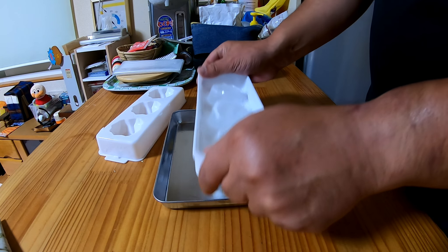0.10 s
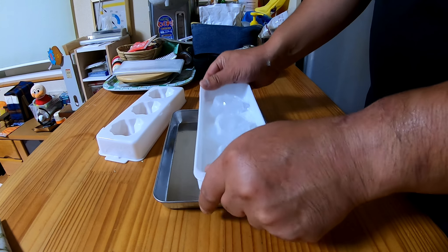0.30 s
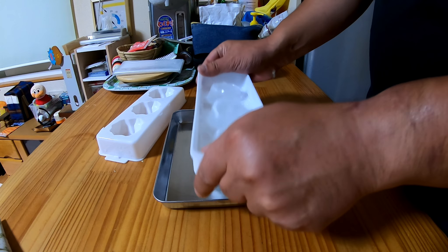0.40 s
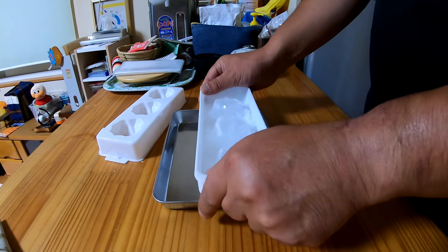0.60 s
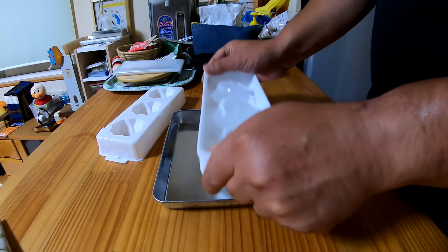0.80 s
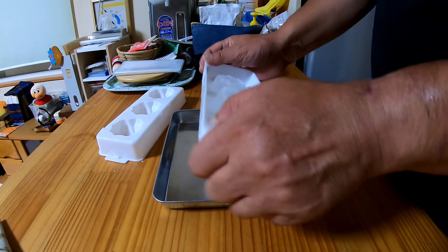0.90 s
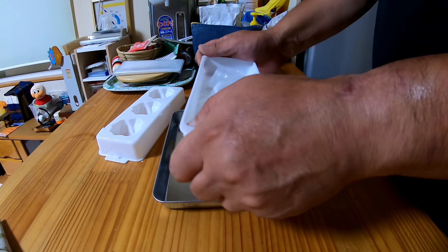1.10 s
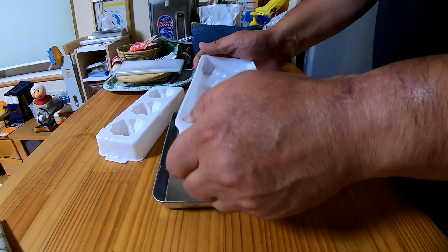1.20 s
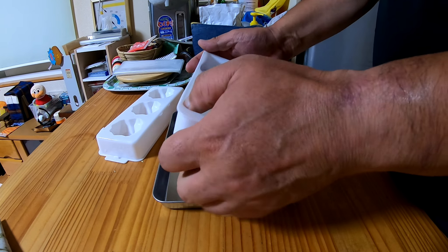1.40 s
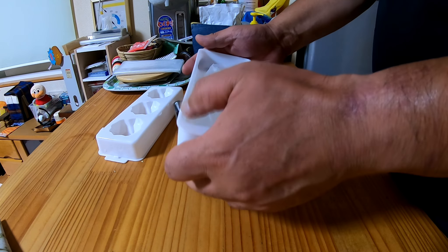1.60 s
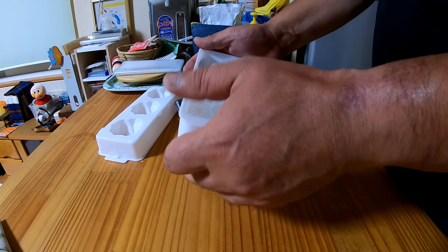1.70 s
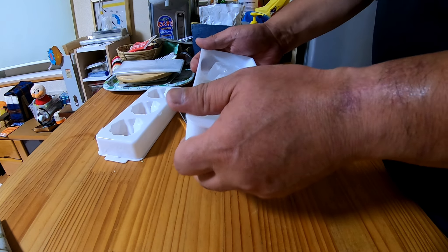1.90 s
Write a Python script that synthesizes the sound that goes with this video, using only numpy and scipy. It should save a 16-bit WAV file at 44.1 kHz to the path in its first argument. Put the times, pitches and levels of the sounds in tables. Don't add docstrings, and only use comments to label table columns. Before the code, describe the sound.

Ice cracks in a twisted plastic tray: two hard snaps with low table thumps, faint creaks and ticks, then a quick clatter and ringing knock on a steel pan; close microphone in a small kitchen.

```python
import sys
import numpy as np
from scipy import signal
from scipy.fft import rfft, irfft
from scipy.io import wavfile
from scipy.ndimage import uniform_filter1d

SR = 44100
rng = np.random.default_rng(int(sys.argv[2]) if len(sys.argv) > 2 else 0)


def log_audio(samples):
    frames = np.atleast_2d(samples).T
    limited = np.clip(frames, -1, 1)
    pcm = np.round(limited * 32767).astype(np.int16)
    wavfile.write(sys.argv[1], SR, pcm)


def volts(x):
    e = np.asarray(x, float) / 20
    return 10 ** e


N = 85995
PRE = 6000
M = N + PRE
DIRECT_SAME = .8

# t/s, level/dB, contact/ms
JOLTS = [
    (-.04, -21.5, 0.99),
    (.228, -29, 0.64),
    (.241, -8.5, 1.66),
    (.533, -31, 4.1),
    (.549, -9, 1.84),
]
# t/s, thud level/dB, contact/ms, ring level/dB
KNOCKS = [(-.015, -23, 0.43, -39.5), (1.497, -57.5, 1.5, -89.5), (1.507, -45.5, 1.16, -58.5),
          (1.535, -40.5, 0.77, -56.5), (1.553, -30, 1.3, -60.5), (1.577, -39, 0.38, -68.5),
          (1.588, -35.5, 0.96, -37.5), (1.600, -18, 1.2, -24.5), (1.606, -18, 0.42, -19),
          (1.616, -18, 2.14, -22.5), (1.630, -32, 0.3, -26.5), (1.647, -26, 0.18, -30)]
# f/Hz, level/dB
RUSTLE = [(500, -31.5), (1300, -13.5), (2400, 0.5), (3200, 0), (4800, -13), (6300, -10), (10300, -27.5),
          (14000, -50)]


def evened(x):
    return x / np.sqrt(np.mean(x ** 2) + 1e-20)


def read(points, hz):
    f, value = np.transpose(points)
    return np.interp(np.log(hz + 1), np.log(f + 1), value)


def curve(points):
    t = (np.arange(M) - PRE) / SR
    return np.interp(t, *np.transpose(points), left=-120, right=-120)


def add(mix, s, sound):
    part = mix[round(s * SR) + PRE:][:len(sound)]
    part += sound[:len(part)]


def butter(x, order, hz, kind="low"):
    return signal.sosfilt(signal.butter(order, hz, kind, fs=SR, output="sos"), x)


def colour(gain_db):
    hz = abs(np.fft.fftfreq(4096, 1 / SR))
    log = np.log(volts(np.maximum(gain_db(hz), -100)))
    taps = np.fft.ifft(np.exp(log - 1j * signal.hilbert(log).imag)).real[:1024]
    return taps / np.linalg.norm(taps)


def tilt(db_per_octave, hz):
    return db_per_octave * np.log2(hz / 2500 + 0.013)


def rings(modes, lead=0.):
    t = np.arange(SR // 2) / SR
    hz, db, t60 = np.transpose(modes)[:, :, None]
    return (volts(db - 60 * t / t60) * np.sin(2 * np.pi * hz * t + lead)).sum(0)


def widen(a, b, same):
    same = np.clip(same, 0, 1)
    return np.array([a, same * a + np.sqrt(1 - same ** 2) * b])


def pushes(rows):
    out = np.zeros(M)
    for s, db, ms, *_ in rows:
        push = np.hanning(max(round(ms * SR / 1000), 4) + 2)
        add(out, s, -volts(db) * push / push.sum())
    return out


def slips():
    slips_per_s, decay_ms, spread_db = 1800, 4.6, 6
    size = volts(spread_db * np.minimum(rng.exponential(1, M), 3))
    size = size * (rng.random(M) < slips_per_s / SR)
    size = signal.lfilter([1], [1, -np.exp(-1000 / (decay_ms * SR))], size)
    return size * widen(*rng.standard_normal((2, M)), DIRECT_SAME)


def kitchen():
    # f/Hz, level/dB per Hz
    air_colour = [(52, 2), (82, -16), (163, -4), (400, -13), (780, -22), (1090, -15), (2180, -17.5),
                  (7480, -51), (15000, -73)]
    # t/s, level/dB
    hum_level = [(-.1, -59), (.5, -54), (.8, -58.5), (.93, -62), (.99, -78), (1.06, -60.5), (1.22, -61.5),
                 (1.3, -81), (1.6, -60), (1.99, -65)]
    air_db, air_same = -63.5, 0.33
    hum_hz, hum_width_hz, steady = 154, 5, .8
    a, b, c = rng.standard_normal((3, M))
    hz = np.fft.rfftfreq(M, 1 / SR)
    air = evened(irfft(rfft(widen(a, b, air_same)) * volts(read(air_colour, hz)), M))
    fuzz = evened(irfft(rfft(c) / (1 + ((hz - hum_hz) / hum_width_hz) ** 4), M))
    hum = steady * np.sin(2 * np.pi * hum_hz * np.arange(M) / SR) + fuzz
    return volts(air_db) * air + volts(curve(hum_level)) * hum


def room(x):
    # f/Hz, t60/s
    decay = [(200, 0.4838), (500, 0.3477), (1200, 0.33), (3000, 0.305), (7000, 0.3619), (13000, 0.37)]
    # f/Hz, likeness/1
    likeness = [(200, 0.93), (700, 0.77), (3000, 0.46), (9000, 0.72)]
    bend, rise_s = 1.5, 0.013
    taps = np.zeros((2, SR))
    at = np.arange(100, SR - 20, 10) + rng.integers(0, 10, (2, (SR - 111) // 10))
    np.put_along_axis(taps, at, rng.choice([-1., 1.], at.shape), 1)
    hz, t, z = signal.stft(taps, SR, nperseg=256)
    z = widen(*z, read(likeness, hz)[:, None])
    z = z * volts(-60 * (t / read(decay, hz)[:, None]) ** bend)
    tail = signal.istft(z, SR, nperseg=256)[1][:, :SR]
    tail = tail * np.minimum(np.arange(SR) / SR / rise_s, 1)
    return signal.fftconvolve(x[None], tail / np.linalg.norm(tail[0]), axes=1)[:, :M]


def table_legs():
    # f/Hz, level/dB, t60/s, left-right/dB
    legs = [(58.3, 0.5, 0.29, -5.5), (72, -3.5, 0.29, -13)]
    # f/Hz, level/dB, t60/s
    short_sway = [(63.6, 1, 0.18)]
    start, lag, lead = 1.6, 3.2, 0.7
    knock_db, knock_pan_db = 2, -13
    sway, nudge = [], []
    for side in (.5, -.5):
        sway.append(sum(volts(side * pan_db) * rings([mode], start + side * lead - k * lag)
                        for k, (*mode, pan_db) in enumerate(legs)))
        nudge.append(volts(knock_db + side * knock_pan_db) * rings(short_sway, side * lead))
    boom = signal.fftconvolve(pushes(JOLTS)[None], np.array(sway), axes=1)
    boom = boom + signal.fftconvolve(pushes(KNOCKS[8:10])[None], np.array(nudge), axes=1)
    return butter(boom, 2, 46, "high")[:, :M]


def table_top():
    # f/Hz, level/dB, t60/s
    near_modes = [(137.1, -2.5, .22), (171.8, -11.5, 0.36), (200.7, -4, 0.095), (215.9, -9, 0.27),
                  (248.6, -15.5, 0.36), (285, -16, 0.28), (305, -9, 0.1), (332, -16.5, 0.19),
                  (426, -24.5, .2), (564, -19.5, 0.3), (776, -8, 0.065), (1050, -15, 0.013),
                  (97.2, -5.5, 0.21), (44, -9, .11)]
    # f/Hz, level/dB, t60/s
    far_modes = [(95, -14, 0.35), (115.5, -8, 0.046), (137.55, -3.5, .28), (167, -11.5, 0.36),
                 (189.9, -4.5, 0.046), (240, -2.5, 0.081), (269.7, -15.5, 0.29), (324.2, -16, 0.22),
                 (361, -12, 0.13), (429, -11.5, .2), (550, -19.5, 0.079), (46.14, -12.5, .12)]
    # f/Hz, level/dB, t60/s
    thud_modes = [(132.65, -7, 0.2), (160, -6.5, 0.054), (173, -11, 0.31), (205, 3, 0.1), (211.4, -13, .22),
                  (252, 1.5, .06), (285, -10.5, 0.24), (377, -11.5, 0.15), (419, -9, 0.26),
                  (485.2, -10, 0.14), (569, -16, 0.12)]
    near = signal.fftconvolve(pushes(JOLTS[:3]), rings(near_modes))
    far_end = signal.fftconvolve(pushes(JOLTS[3:]), rings(far_modes))
    thud = signal.fftconvolve(butter(pushes(KNOCKS), 2, 110, "high"), rings(thud_modes))
    return (near + far_end + thud)[:M]


def steel_pan():
    # f/Hz, level/dB, t60/s
    clear_modes = [(966, -5.5, 0.16), (1205, -1, .22), (1530, -12.5, 0.14), (2200, -3, 0.22),
                   (2280, -1.5, 0.26), (2457, -10.5, 0.22), (2740, -4.5, 0.12), (2700, -5, .2),
                   (3015, -3, .2), (3221, -3, 0.28), (3627, -9.5, .22), (4020, -6.5, .2), (4250, -13, 0.16),
                   (4380, -10, 0.22)]
    low_hz, high_hz, crowd_db, crowd_t60 = 1720, 4420, -13, 0.18
    rattle, t = np.zeros(M), np.arange(600) / SR
    for (s, _, _, ring_db), z in zip(KNOCKS, rng.standard_normal((len(KNOCKS), 600))):
        add(rattle, s, volts(ring_db - 29.5) * z * np.exp(-t / 0.0055))
    rattle = butter(rattle, 2, 5200)
    crowd = []
    for ear in rng.random((2, 150, 2)):
        modes = [(low_hz + (high_hz - low_hz) * u, crowd_db + 0.95 * g - 40 * (u - .35) ** 2, crowd_t60)
                 for u, g in ear]
        crowd.append(rings(modes))
    pan = widen(*crowd, DIRECT_SAME) + rings(clear_modes)
    return signal.fftconvolve(rattle[None], pan, axes=1)[:, :M]


def creak():
    # t/s, level/dB
    strain = [(.89, -73), (.93, -52), (.97, -56), (1.06, -71), (1.13, -83), (1.2, -96), (1.3, -67.5),
              (1.34, -73), (1.41, -59.5), (1.46, -75), (1.5, -54.5), (1.55, -49), (1.594, -43),
              (1.604, -22), (1.66, -35.5), (1.74, -62), (1.9, -83.5), (1.95, -60.5)]
    # t/s, level/dB
    scrape = [(1.48, -69), (1.51, -58), (1.53, -55.5), (1.55, -42.5), (1.57, -53), (1.59, -37.5),
              (1.62, -31.5), (1.66, -83.5)]
    taps = colour(lambda hz: read(RUSTLE, hz) + tilt(-1.23, hz))
    bend = evened(signal.oaconvolve(slips(), taps[None], axes=1)[:, :M])
    rub = evened(butter(slips(), 2, (262, 1650), "band"))
    return bend * volts(curve(strain)) + rub * volts(curve(scrape))


def cracks():
    # t/s, peak level/dB, burst length/ms, brightness/(dB per
    # octave), tray cell f/Hz
    ice_cracks = [
        (-.07, -6, 1.3, 0.56, 1430),
        (-.003, -27.5, 3.3, 4, 2543),
                  (.1805, -45.5, 1.8, -7, 1830), (.195, -49.5, 14, -9, 2010), (.218, -38.5, 7.5, -9, 3440),
           (.228, -29.5, 5.7, 0.5, 870), (0.24, -4.5, 1.48, -3, 1793), (0.242, -12, 2, 0.5, 1744),
           (.2436, -10, 3.4, 3, 3777), (.2465, -21.5, 1.3, 0.5, 6480), (.2505, -17, 2.7, -3.5, 2380),
           (.5065, -37, 5.3, -1.5, 2110), (.514, -41, 4.1, -4, 3000), (.5222, -31, 5.4, -3.5, 1870),
           (.533, -33.5, 17, 1, 2380), (.5467, -11.5, 1.63, 4.5, 3970), (.5490, -14.5, 2.3, 3, 2730),
           (.5503, -7.5, 3.3, -0.5, 2745), (0.5544, -16.5, 3.9, 0, 1820), (.5595, -21, 3, 1.5, 2300),
           (.5640, -22.5, 1.4, 1, 2780), (.9216, -47, 4.2, -9.5, 2190), (.9349, -39, 8.8, 0, 2200),
           (.941, -37, 4, 1.5, 3370), (.946, -41, 6.7, 2, 2050), (.952, -48.5, 13, 3.5, 870),
           (.968, -52, 10, 0.5, 860), (.989, -44, 2.4, 4, 2730), (1.0166, -34, 2.9, 2, 3050),
           (1.0214, -33.5, 2.2, 2.5, 3600), (1.038, -46.5, 2.8, 5, 3200), (1.1243, -47.5, 2.3, 1, 3185),
           (1.311, -59, 12, -5, 2380), (1.3563, -49, 3.9, -4, 3220), (1.4062, -47, 3, 0, 2770),
           (1.4446, -50, 9, -3, 2950), (1.4490, -46, 2.3, 2, 5800), (1.4544, -51, 9.3, -7, 3000)]
    chatter = [(1.5052, -37.5, 3, 3, 2660), (1.533, -31.5, 2.8, -8.5, 850), (1.538, -26.5, 3.1, -9, 566),
               (1.546, -29, 5.9, -8.5, 1240), (1.554, -26.5, 5.5, -9.5, 606.6),
               (1.5740, -19.5, 2.1, -8, 1800), (1.5855, -20.5, 2.2, -6.5, 1659), (1.593, -27, 3.5, -3, 801),
               (1.5990, -14.5, 2, -7, 1394), (1.6047, -14.5, 4, -2, 2963), (1.628, -21.5, 6, -5.5, 1205)]
    # f/Hz, level/dB
    plastic = [(150, -39.5), (750, -7.5), (2700, -1), (3900, -10), (5000, -13.5), (6800, -13), (10000, -29),
               (15300, -57.5)]
    big_db = -22
    dull_hz = 1780
    small_rise_s, big_rise_s = .0012, .0002
    snap = 1.1
    cell_share, cell_cycles = 0.76, 30
    out, far, t = np.zeros((2, M)), np.zeros(M), np.arange(900) / SR
    rows = ice_cracks + chatter
    for (s, db, ms, slope, cell_hz), z in zip(rows, rng.standard_normal((len(rows), 2, 900))):
        big = db > big_db
        body = plastic if big or cell_hz < dull_hz else RUSTLE
        taps = volts(db - 2.5) * colour(lambda hz: read(body, hz) + tilt(slope, hz))
        cell = rings([(cell_hz, 0, cell_cycles / cell_hz)])[:len(taps)]
        taps = taps + volts(db - 6.0) * cell_share * cell / np.linalg.norm(cell)
        rise = np.minimum(t / (big_rise_s if big else small_rise_s), 1)
        burst = widen(*z, DIRECT_SAME) * rise * np.exp(-t * 1000 / max(ms, .3))
        burst = burst + snap * big * np.exp(-((t - .0004) / .00009) ** 2)
        for ear, part in zip(out, burst):
            add(ear, s, np.convolve(part, taps))
        add(far, s, taps * np.linalg.norm(burst) / np.sqrt(2))
    return out, far


def scene():
    boom, wood, steel, rub = table_legs(), table_top(), steel_pan(), creak()
    snaps, far = cracks()
    direct = (snaps + rub + steel) * volts([[-.5], [.5]]) + wood + boom
    wet = volts(-5) * room(far + rub[0] + 0.47 * steel[0] + .12 * wood)
    return (direct + wet + kitchen())[:, PRE:]


def low_pass(x):
    return signal.sosfilt(signal.butter(12, 15360, fs=SR, output="sos"), x)


def record(dry):
    side_lift_hz, side_lift = 6560, 1.4
    knee_db, squeeze, clamp_s, recover_db_per_s = -26, 0.13, 0.0074, 132.5
    makeup_db, ceiling = -1, 2.8
    x = butter(butter(dry, 1, 40, "high"), 2, 26, "high")
    lift = signal.butter(2, side_lift_hz, "high", fs=SR, output="sos")
    side = signal.sosfiltfilt(lift, x[0] - x[1]) * side_lift / 2
    x = x + np.array([side, -side])
    power = uniform_filter1d((x ** 2).mean(0), size=200, origin=99)
    power_db = 10 * np.log10(abs(power) + 1e-12)
    fall = np.arange(N) * recover_db_per_s / SR
    held_db = np.maximum.accumulate(power_db + fall) - fall
    over_db = np.maximum(held_db - knee_db, 0)
    r = np.exp(-1 / (clamp_s * SR))
    x = x * volts(makeup_db - squeeze * signal.lfilter([1 - r], [1, -r], over_db))
    return low_pass(ceiling * np.tanh(x / ceiling))


dry = scene()
out = record(dry)
log_audio(out)
```